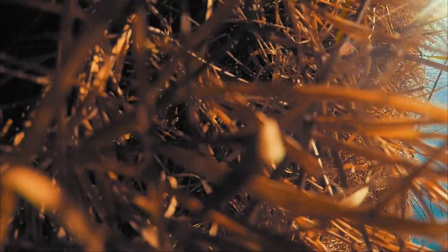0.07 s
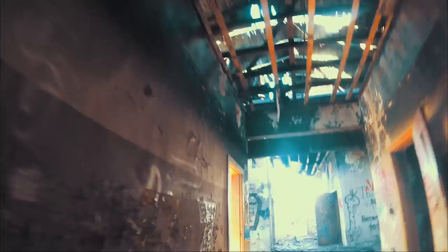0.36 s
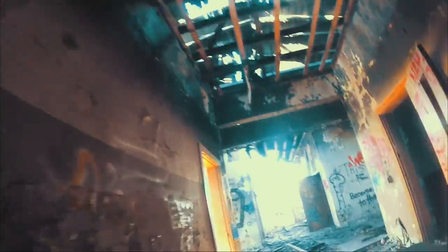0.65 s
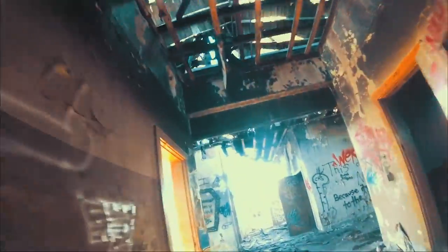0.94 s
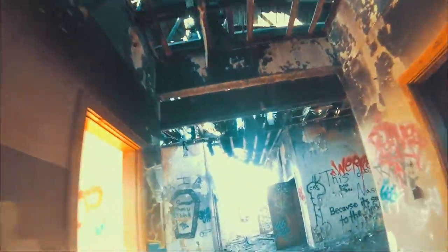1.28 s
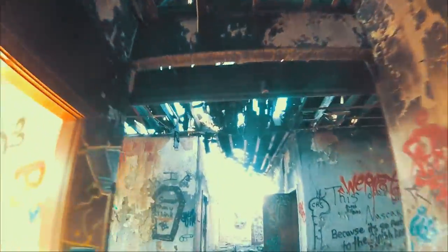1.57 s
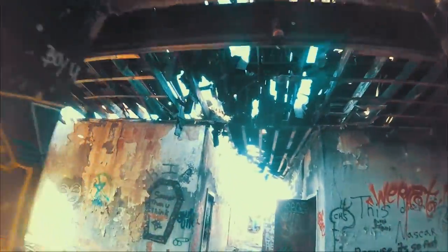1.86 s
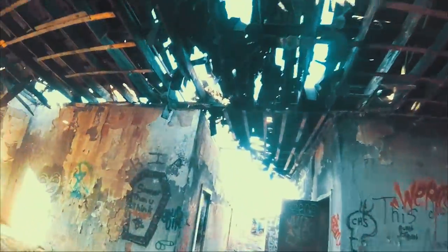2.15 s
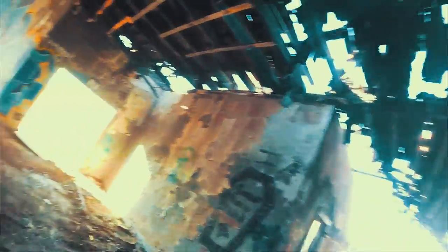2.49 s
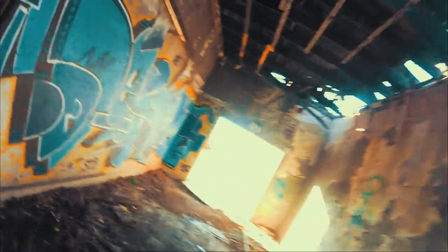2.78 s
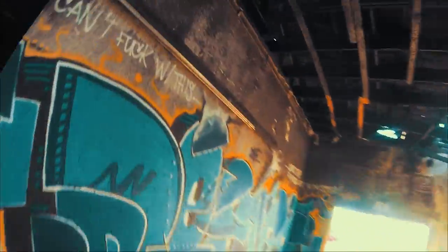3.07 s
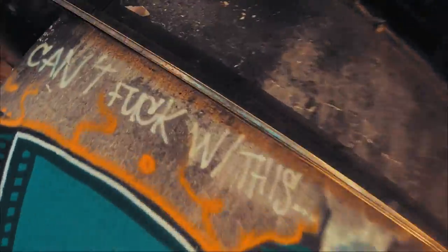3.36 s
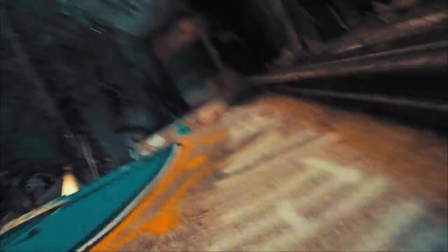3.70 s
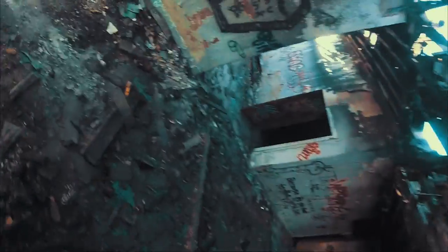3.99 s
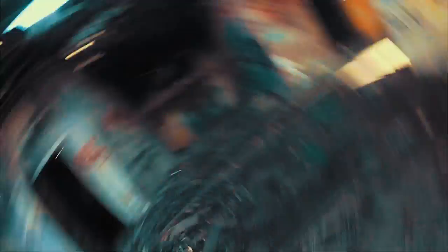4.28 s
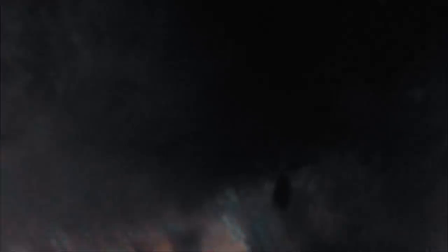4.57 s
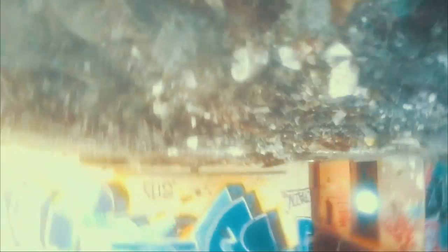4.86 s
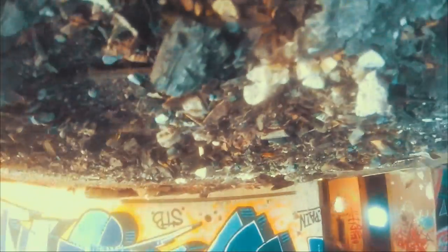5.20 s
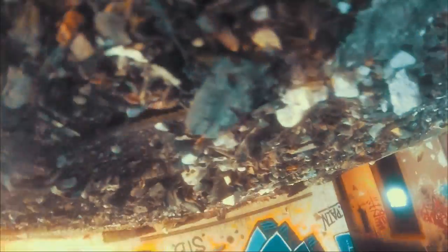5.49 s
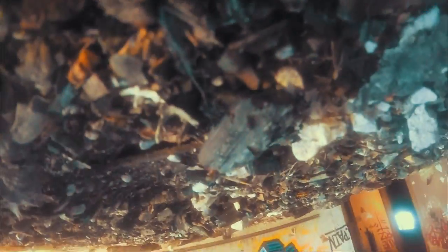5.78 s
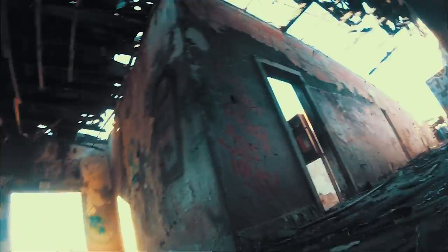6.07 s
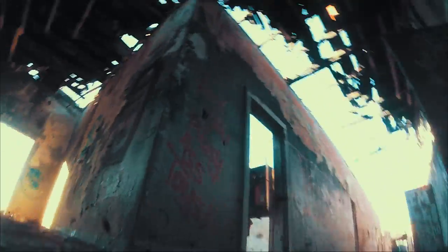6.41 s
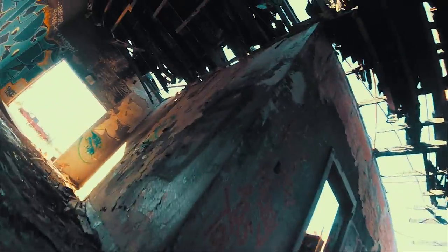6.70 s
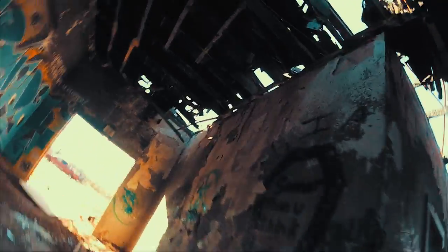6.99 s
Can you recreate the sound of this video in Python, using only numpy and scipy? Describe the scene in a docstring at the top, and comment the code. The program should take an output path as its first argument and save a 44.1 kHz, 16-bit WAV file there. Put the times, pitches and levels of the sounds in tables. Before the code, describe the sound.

After a near-silent moment, a small drone's propellers cut in at about 0.4 seconds, buzzing and hissing, heard close from on board inside a derelict house. The pitch wavers, air buffets the microphone from around 2 seconds, and the motors swoop up near 2.9 seconds. At about 3.6 seconds the drone clips a wall with two sharp knocks and a tiny scrape, then chirps through several quick revs. Another hit comes at 4.4 seconds, and the buzz drops away as the drone tumbles, with knocks, rattles and blades flicking grit in the rubble. The motors stop at about 5.3 seconds, leaving a few light taps and faint ticking of settling debris. At 6.1 seconds they start again, surging with a knock and low gusts of air. The buzz climbs in pitch near 6.8 seconds and eases with a thin whine just after 7 seconds.

```python
"""Four three-bladed propellers drive a small racing quadcopter through a derelict house.
Heard from its own camera, they drone, beat and hiss, swooping with each punch of throttle,
while their wash buffets the microphone. The craft clips a wall and its frame rings; it tumbles,
thrashes in the rubble and rocks to rest. Then the motors start again and it lifts off."""
import sys
import numpy as np
from scipy import signal
from scipy.fft import rfft, irfft, next_fast_len
from scipy.io import wavfile

SR = 44100
rng = np.random.default_rng(int(sys.argv[2]) if len(sys.argv) > 2 else 0)


def store_pcm(level_fs):
    """Save levels as 16-bit WAV."""
    pcm = np.round(np.clip(level_fs, -1, 1) * 32767).astype(np.int16)
    wavfile.write(sys.argv[1], SR, np.atleast_2d(pcm).T)


N = 319725
TIME = np.arange(N) / SR
START_S, STOP_S, RESTART_S = .428, 5.35, 6.1
MOTORS_ON = (TIME > START_S) & (TIME < STOP_S) | (TIME > RESTART_S)

# Rotor loudness against a hover. Each row: time in seconds, tones in dB, air noise in dB.
FLIGHT_LEVEL = [(.43, 0.5, -0.5), (2.1, 0, 1.5), (2.68, -1, 6), (2.92, -1, -1.5), (3.68, -0.5, -1),
                (3.77, -13.5, -11), (3.86, -10, -4.5), (4.14, -8, -5.5), (4.24, -5, -7), (4.41, -2.5, -3),
                (4.46, -21, -9), (4.8, -30, -17.5), (5.22, -25.5, -2), (5.35, -48.5, -20)]
TAKEOFF_LEVEL = [(6.101, -9.5, -6), (6.21, -9.5, -13.5), (6.26, -1.5, 3.5), (6.34, -8, -2.5),
                 (6.44, -0.5, 0), (6.6, -3, -4.5), (6.76, -2.5, -0.5), (7.25, -3.5, -0.5)]
# Impacts. Each row: time in seconds, crack in dB, thud in dB, thud pitch in Hz, length in seconds.
BLOWS = [(3.637, -13, -6, 200, 0.013), (3.697, -12.5, -4, 303, 0.0095), (4.413, -12.5, -7.5, 42, 0.0067),
         (4.571, -17, -44, 446, 0.015), (4.585, -28, -12.5, 133, 0.0043), (4.676, -15, -8, 56.4, 0.01),
         (5.176, -35, -33, 260, 0.018), (5.248, -17, -8, 136, 0.013), (5.447, -33.5, -21.5, 79.7, 0.0066),
         (5.519, -43, -31, 79.4, 0.011), (5.573, -44.5, -40, 131, 0.014), (5.59, -35.5, -28, 203, 0.0025),
         (5.985, -50, -64.5, 300, 0.0018), (6.239, -22, -20, 75.5, 0.014)]
# Modes of the frame. Each row: frequency in Hz, level in dB, time to fall 60 dB in seconds.
FRAME_MODES = [(43, 3, 0.1), (84.4, -3, 0.19), (128.2, -1, 0.36), (226, -1.5, 0.068), (326, 0.5, 0.067),
               (445, -9.5, 0.08), (527, -6, 0.14), (810, -23, 0.24), (1054, -17, 0.04)]


def propellers(shaft_db=-12, blade_db=-14.5, rush_db=-28.5, hiss_db=-31.5):
    """Aerodynamic sound: periodic forces on the rotors make tones, turbulence makes broadband noise."""
    slow, fast = speed_range()
    # From the wall strike until it clears the ground, the craft runs rough in its own wash.
    wash = np.interp(TIME, [3.5, 3.7, 6.35, 6.6], [0, 1, 1, 0])
    tones_db, air_db = in_time(FLIGHT_LEVEL + TAKEOFF_LEVEL)
    unloaded_octaves = np.clip(np.log2(171.1 / ((slow + fast) / 2)), 0, .5)   # slow blades unload
    shaft = from_db(shaft_db + tones_db - 16 * swell(6.42, 0.24))   # the hum is weak at lift-off
    blade = from_db(blade_db + tones_db - 12.5 * unloaded_octaves)
    rush = from_db(rush_db + air_db)
    hiss = from_db(hiss_db + air_db - 6.5 * wash)
    # Hard-driven air sharpens the blade pulses.
    bite = (rush / blade * from_db(blade_db - rush_db)) ** (0.78 * (1 - wash))
    hum, drone, speeds, angles = rotor_tones(slow, fast, wash, bite)
    tones = shaft * hum + blade * drone * from_db(-2.5 * wash)
    air = blade * churning(wash) + rushing_air(angles, rush, hiss)
    return MOTORS_ON * (tones + air + motor_whine(speeds, angles, hiss))


def speed_range():
    """Pitch follows rotation rate: the slowest and fastest motor's trim, plus throttle punches."""
    # Motor trim. Each row: time in seconds, slowest and fastest rate in turns per second.
    flight_trim = [(.43, 172.3, 187.5), (.95, 163.7, 183), (1.5, 160, 180), (2.1, 155, 175),
                   (2.3, 129.4, 189), (2.5, 142, 199), (2.75, 156, 189.5), (3.15, 155, 186),
                   (3.48, 120, 155.3), (3.78, 114.5, 145), (3.9, 152, 190), (4.28, 158, 184),
                   (4.4, 136, 227), (4.5, 104, 134), (5.2, 138, 170), (5.3, 67, 80)]
    takeoff_trim = [(6.101, 82, 128), (6.21, 76.86, 82), (6.28, 168.4, 188.2), (6.6, 173.7, 186.7),
                    (7.08, 150.8, 166.9), (7.25, 126.4, 160)]
    # Throttle punches. Each row: middle and length in seconds, added turns per second.
    punches = [(2.914, 0.43, 70), (3.652, 0.18, 66), (4.126, .22, 60), (6.52, .18, 40), (6.836, 0.48, 64.6)]
    throttle = sum(added * arch(s, length) for s, length, added in punches)
    return [trim + throttle for trim in in_time(flight_trim + takeoff_trim)]


def rotor_tones(slow, fast, wash, bite, hunting=0.002876, wander=.15, flutter=0.71):
    """Imbalance hums at the turn rate, blades pass at three times it, and unequal rotors beat."""
    # Motors. Each row: place from slowest (0) to fastest (1), shaft level in dB, blade level in dB.
    motors = [(0., -1, 3.5), (0.303, -10.5, -7.5), (0.699, -8.5, -6), (0.999, -7, -3.5)]
    # Shaft and blade harmonics. Each row: multiple of the turn rate, level in dB.
    shaft_orders = [(1, 0.5), (2, -14), (4, -38)]
    blade_orders = [(6, -20), (9, -32), (12, -29.5), (14, -32), (17, -35.5), (20, -33.5)]
    lead_db = np.interp(fast, [190, 240], [0, 10])   # near full throttle the fastest rotor leads
    hum = drone = hum_power = drone_power = 0
    speeds, angles = [], []
    for place, shaft_db, blade_db in motors:
        between = place + wander * 4 * place * (1 - place) * drift(2)
        stumble = .04 * wash * drift(45)
        trimming = hunting * drift(13.83)   # the controller keeps trimming each motor
        speed = (slow + (fast - slow) * between) * (1 + trimming + stumble)
        angle = 2 * np.pi * np.cumsum(speed) / SR
        grip = (speed / fast) ** (2.1 * wash)   # slow rotors lose their grip in the wash
        shaft_gain = from_db(shaft_db + lead_db * place)
        blade_gain = from_db(blade_db + lead_db * place) * grip
        hum += shaft_gain * overtones(angle, shaft_orders, .06)
        passing = overtones(angle, [(3, 0)], flutter * (.5 + wash))
        load = (2 * speed / (slow + fast)) ** (4 * (1 - wash))
        sharpness = bite * load * (speed / 150) ** 0.57   # harder pull, faster tips: sharper pulses
        drone += blade_gain * (passing + sharpness * overtones(angle, blade_orders, flutter / 2))
        hum_power += shaft_gain ** 2
        drone_power += blade_gain ** 2
        speeds.append(speed)
        angles.append(angle)
    drone = filtered(drone, 4, 3400)   # dulled by the camera housing
    return hum / np.sqrt(hum_power), drone / np.sqrt(drone_power), speeds, angles


def churning(wash):
    """Turbulent inflow: the air churns louder as the craft slips through its own wash."""
    # Churn spectrum. Each row: frequency in Hz, spectral density in dB.
    spectrum = [(100, -26.5), (230, -8), (310, 1), (400, -7.5), (590, 2), (760, -12.5), (1000, -22)]
    # Slips through the wash. Each row: middle and width in seconds, added level in dB.
    slips = [(2.2, .6, 7.5), (3.381, 0.26, 9.5)]
    slip_db = sum(db * swell(s, width) for s, width, db in slips)
    return from_db(-12 + 8 * wash + slip_db) * noise(spectrum)


def rushing_air(angles, rush, hiss, chop=0.43, knock_s=3.7):
    """Amplitude modulation: the passing blades chop the rush of air and the hiss of their tips."""
    # Spectra of rush, hiss, and the narrower hiss once the frame has taken a knock.
    # Each row: frequency in Hz, spectral density in dB.
    rush_spectrum = [(600, 5.5), (1050, -3), (1300, -4), (2050, -3.5), (2400, -6), (2850, -2), (3350, 0.5),
                     (3750, -14.5), (4500, -16.5), (5500, -29.5)]
    hiss_spectrum = [(3800, 1.5), (4650, -9.5), (5100, -1.5), (5550, -1), (5850, -14.5), (6250, 4),
                     (6650, 1.5), (7000, -12.5), (7400, 0.5), (7950, -10.5), (9000, -10.5), (9900, -25.5),
                     (10900, -15), (12100, -48), (13100, -26.5), (14200, -47)]
    knocked_spectrum = [(4000, -26), (5100, -19.5), (5700, 2), (6450, 4), (7100, -10), (7500, -2.5),
                        (8900, -9), (9900, -22), (11000, -20), (12000, -35.5), (13000, -28), (14200, -45)]
    tips = np.where(TIME < knock_s, noise(hiss_spectrum), noise(knocked_spectrum))
    pulsing = sum(np.sin(3 * angle) for angle in angles) / 2
    air = rush * noise(rush_spectrum) + hiss * tips
    return air * (1 + chop * pulsing) * from_db(-3 + .5 * drift(18))


def motor_whine(speeds, angles, hiss, drive_hz=24000):
    """Commutation, 42 steps a turn, rings the motor bells; at low speed its octave mixes with the drive."""
    # Whine, strongest as the throttle is eased. Each row: time in seconds, level in dB.
    whine_level = [(3.1, -58), (3.5, -33.5), (3.7, -54), (6.9, -44), (7.1, -36), (7.23, -23)]
    whine, = from_db(in_time(whine_level))
    steps = sidebands = 0
    for speed, angle in zip(speeds, angles):
        steps += np.sin(42 * angle + drift(150)) / np.sqrt(2)
        mixing = np.sin(84 * angle) + np.sin(2 * np.pi * drive_hz * TIME - 84 * angle)
        sidebands += mixing * np.minimum(125 / speed, 1) ** 6
    return whine * filtered(steps, 2, [5000, 6900], "band") + from_db(-30) * hiss * sidebands


def righting_revs(base_turns_per_s=140, flutter=0.61, stumble=0.02):
    """Harmonic glide: one propeller chirps up and back to right the craft, loudest at the top."""
    # Revs. Each row: middle and length in seconds, top turns per second, blade and shaft levels in dB.
    revs = [(3.736, .11, 300, -33, -11.5), (3.793, 0.11, 346, -33.5, -23.5),
            (3.868, .11, 313, -25.5, -15.5), (3.941, 0.15, 240, -33, -21.5), (4.477, .13, 332, -34, -50.5)]
    # Blade harmonics. Each row: multiple of the turn rate, level in dB.
    orders = [(3, -1.5), (6, -14), (9, -9), (12, -14)]
    chirps = np.zeros(N)
    unsteady = 1 + stumble * drift(90)
    gusty = 1 + flutter * drift(60)
    for s, length, top, blade_db, shaft_db in revs:
        span = np.abs(TIME - s) < length / 2
        effort = arch(s, length)[span]
        speed = (base_turns_per_s + (top - base_turns_per_s) * effort) * unsteady[span]
        angle = 2 * np.pi * np.cumsum(speed) / SR
        blades = sum(from_db(blade_db + db) * np.sin(round(k) * angle) for k, db in orders)
        chirps[span] += np.sqrt(2) * effort ** 2 * (blades + from_db(shaft_db) * np.sin(angle))
    return filtered(chirps * gusty + 1e-18, 6, 3200)   # dulled by the camera housing


def frame_thuds(focus=0.89):
    """Modal response: each blow is an impulse that rings mainly the frame modes near its own pitch."""
    s, _, thud_db, thud_hz, _ = np.transpose(BLOWS)
    thuds = 0
    for k, (hz, db, t60) in enumerate(FRAME_MODES):
        detuning = 1 + focus * np.log2(hz / thud_hz) ** 2
        pushes = np.zeros(N)
        pushes[np.round(s * SR).astype(int)] = from_db(thud_db + db) / detuning
        thuds += (-1) ** k * ring(pushes, hz, t60)
    return thuds


def blade_strikes():
    """Impact noise: each blow is a crunch of tiny contacts, and the struck plastic blades ring on."""
    # Modes of a blade. Each row: frequency in Hz, level in dB, time to fall 60 dB in seconds.
    blade_modes = [(1055, 1.5, 0.021), (2980, -10.5, 0.016), (3210, -10.5, 0.053)]
    # Crack spectrum. Each row: frequency in Hz, spectral density in dB.
    spectrum = [(200, 2), (470, 13), (750, 1.5), (1080, -3), (1350, -2.5), (2300, -3.5), (2950, -5.5),
                (3600, -5.5), (4600, -18), (6500, -10.5), (9000, -23.5), (14000, -53)]
    contact = sum(from_db(db) * burst(s, length) for s, db, _, _, length in BLOWS)
    strikes = contact * grains(450, spread_db=4.5) / 2
    crunch = contact ** 2 / (contact + from_db(-46))   # light touches only tick, hard ones crunch
    return resonate(strikes, blade_modes) / 2 + crunch * coloured(spectrum, grains(5000, spread_db=3.5))


def wall_scrapes():
    """Friction noise: a blade sliding along the wall makes a shrill run of tiny contacts."""
    # Scrapes. Each row: time in seconds, level in dB, length in seconds.
    scrapes = [(3.649, -25.5, 0.0075), (4.378, -39, 0.018), (4.406, -22.5, 0.0052)]
    # Scrape spectrum. Each row: frequency in Hz, spectral density in dB.
    shrill = [(4000, -18.5), (7500, 6), (10500, -4.5), (12000, -19.5), (15000, -24.5)]
    contact = sum(from_db(db) * burst(s, length) for s, db, length in scrapes)
    return contact * coloured(shrill, grains(2300, spread_db=3.5))


def thrashing():
    """Random impact excitation: blades flick grit about and rattle the upturned frame."""
    # Scuffs in the rubble. Each row: middle and width in seconds, grit in dB, frame rattle in dB.
    scuffs = [(4.549, 0.017, -28.5, -42), (4.62, 0.046, -34.5, -26), (4.925, 0.037, -22.5, -34),
              (5.01, 0.031, -27, -36), (5.058, 0.014, -31, -28), (5.13, 0.11, -40.5, -57),
              (5.192, 0.021, -26.5, -16), (5.282, 0.04, -31, -20)]
    # Grit spectrum. Each row: frequency in Hz, spectral density in dB.
    spectrum = [(200, -1), (480, 6), (800, -15), (1050, 1.5), (1400, -9.5), (3200, -4.5), (4600, -12),
                (6200, -14.5), (8500, -22.5), (14000, -60)]
    grit = sum(from_db(db) * swell(s, width) for s, width, db, _ in scuffs)
    rattle = sum(from_db(db) * swell(s, width) for s, width, _, db in scuffs)
    body = resonate(grains(900, spread_db=-1), FRAME_MODES[3:])
    return grit * coloured(spectrum, grains(3500, spread_db=3)) + rattle * rms_one(body)


def buffeting(downwash_db=-29.5, jolt_db=-17.5, jolt_t60_s=0.86):
    """Incoherent sources add in power: wash, gusts and the jolt of each blow rumble on the microphone."""
    # Gusts. Each row: middle and width in seconds, level in dB.
    gusts = [(.04, 0.11, -55), (2.3, 0.34, -19.5), (2.85, 0.46, -22), (3.55, 0.27, -24),
             (4.33, 0.066, -18.5), (6.265, 0.044, -7.5), (6.43, 0.052, -11.5), (6.88, .06, -24)]
    # Rumble spectrum. Each row: frequency in Hz, spectral density in dB.
    spectrum = [(15, -12), (30, -7), (75, -0.5), (130, -4.5), (250, -24.5), (600, -28), (3000, -63)]
    tones_db, _ = in_time(FLIGHT_LEVEL + TAKEOFF_LEVEL)
    power = (MOTORS_ON * from_db(downwash_db + .8 * tones_db)) ** 2
    power += sum((from_db(db) * swell(s, width)) ** 2 for s, width, db in gusts)
    power += sum((from_db(db + jolt_db) * dying(s, jolt_t60_s)) ** 2 for s, _, db, _, _ in BLOWS)
    return np.sqrt(power) * noise(spectrum)


def settling_grit(level_db=-51, clumps_db=5):
    """Decaying shot noise: crumbs of rubble tick against the frame once the motors stop."""
    # Tick spectrum. Each row: frequency in Hz, spectral density in dB.
    spectrum = [(400, 13.5), (1800, -14), (3000, 0), (4200, -19), (8000, -21.5)]
    ticking = coloured(spectrum, grains(1300, spread_db=4.5))
    return from_db(level_db + clumps_db * drift(23)) * dying(STOP_S, t60=1.3) * ticking


def house_hush():
    """Ambient noise floor: the faint, low hush of the open house."""
    return from_db(-73) * noise([(100, 2.5), (1500, -27), (12000, -41.5)])


def from_db(db):
    """Decibels to amplitude gain."""
    return np.exp(np.asarray(db) * (np.log(10) / 20))


def rms_one(x):
    """Normalisation to unit power."""
    return x / np.sqrt(np.mean(x ** 2) + 1e-20)


def in_time(rows):
    """Linear interpolation of each column of a curve to every sample."""
    s, *columns = np.transpose(rows)
    return [np.interp(TIME, s, c) for c in columns]


def drift(hz):
    """Low-passed noise: a slow random fluctuation of rms 1."""
    hop, run_in = 40, 2000
    r = np.exp(-2 * np.pi * hz * hop / SR)
    white = rng.standard_normal(N // hop + run_in + 2)
    slow = signal.lfilter([1], [1, -2 * r, r * r], white)[run_in:]
    return np.interp(np.arange(N) / hop, np.arange(len(slow)), rms_one(slow))


def filtered(x, order, hz, kind="low"):
    """Maximally flat filtering."""
    return signal.sosfilt(signal.butter(order, hz, kind, fs=SR, output="sos"), x)


def coloured(spectrum, x):
    """Spectral shaping to rms 1, falling 24 dB an octave beyond the ends of the spectrum."""
    size = next_fast_len(N)
    hz, db = np.transpose(spectrum)
    bins = np.maximum(np.arange(size // 2 + 1) * SR / size, 1)
    octaves_outside = np.maximum(np.log2(bins / hz[-1]), 0) + np.maximum(np.log2(hz[0] / bins), 0)
    gain = from_db(np.interp(np.log(bins), np.log(hz), db) - 24 * octaves_outside)
    return rms_one(irfft(rfft(x, size) * gain, size)[:N])


def noise(spectrum):
    """Turbulence as coloured noise of rms 1."""
    return coloured(spectrum, rng.standard_normal(N))


def grains(per_s, spread_db):
    """Shot noise: random tiny contacts of uneven size."""
    sizes = from_db(spread_db * np.minimum(rng.exponential(1, N), 4)) * rng.choice([-1, 1], N)
    return sizes * (rng.random(N) < per_s / SR)


def ring(clicks, hz, t60):
    """Damped resonator: a unit click starts a decaying sine of height 1."""
    r, w = from_db(-60 / (t60 * SR)), 2 * np.pi * hz / SR
    return signal.lfilter([0, np.sin(w)], [1, -2 * r * np.cos(w), r * r], clicks + 1e-18)


def resonate(clicks, modes):
    """Modal superposition: the same clicks ring every mode."""
    return sum(from_db(db) * ring(clicks, hz, t60) for hz, db, t60 in modes)


def overtones(angle, orders, flutter):
    """Harmonics locked to the shaft angle, each fluttering in the disturbed air."""
    lines = 0
    for k, db in orders:
        phase = round(k) * angle + rng.uniform(0, 2 * np.pi)
        lines += from_db(db) * np.sin(phase) * (1 + flutter * drift(40))
    return np.sqrt(2) * lines


def burst(s, length_s):
    """Contact envelope: the blade tips catch first, the frame bites, then it dies away."""
    age = np.clip((TIME - s) / length_s - .5, -20, 20)
    return 2 / (np.exp(-3 * age) + np.exp(age))


def arch(s, length_s):
    """Half-cosine envelope of a burst of throttle."""
    return np.cos(np.pi * np.clip((TIME - s) / length_s, -.5, .5))


def swell(s, width_s):
    """Bell-shaped envelope around a moment."""
    return np.exp(-np.minimum(((TIME - s) / width_s) ** 2, 50))


def dying(s, t60):
    """Exponential decay from a sudden start."""
    return (TIME > s) * from_db(-60 * np.clip((TIME - s) / t60, 0, 3))


def scene():
    """Superposition of flight, crash and background in one channel."""
    flight = propellers() + righting_revs()
    crash = frame_thuds() + blade_strikes() + wall_scrapes() + thrashing()
    return (flight + crash + buffeting() + settling_grit() + house_hush())[None]


def record(dry, ceiling=0.93, stopband_hz=16000):
    """Soft saturation and band limiting: the camera rounds the highest peaks and cuts the top."""
    rounded = dry / (1 + (dry / ceiling) ** 6) ** (1 / 6)
    return signal.sosfilt(signal.cheby2(12, 70, stopband_hz, fs=SR, output="sos"), rounded)


dry = scene()
out = record(dry)
store_pcm(out)
```